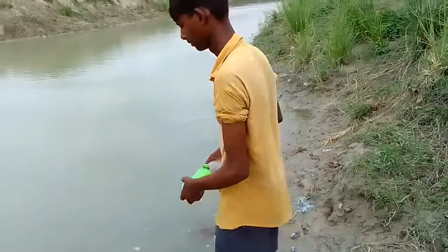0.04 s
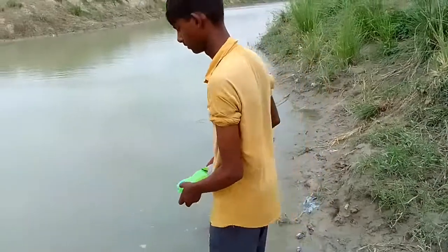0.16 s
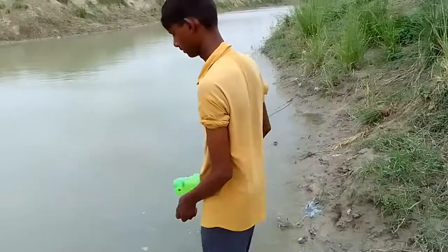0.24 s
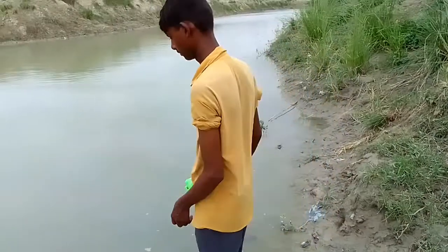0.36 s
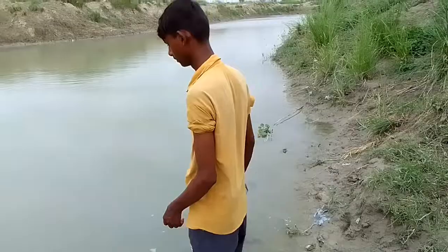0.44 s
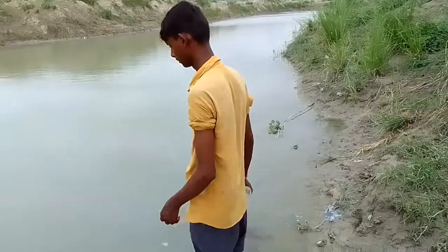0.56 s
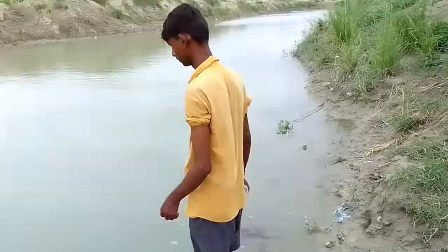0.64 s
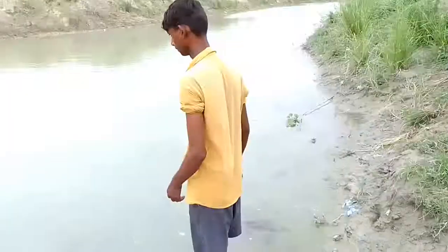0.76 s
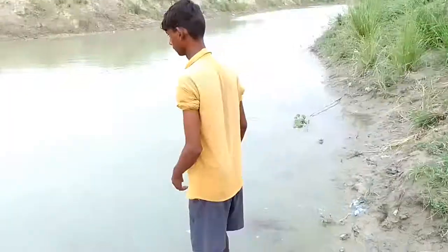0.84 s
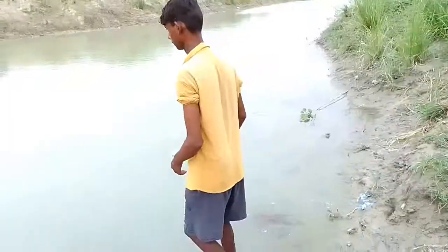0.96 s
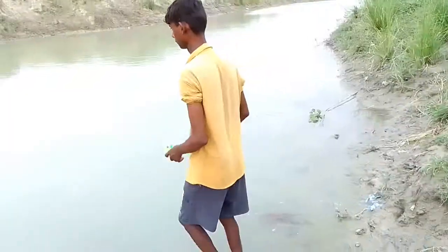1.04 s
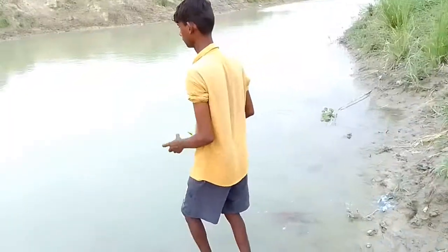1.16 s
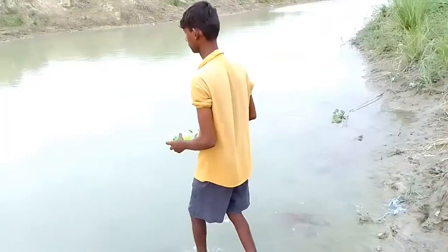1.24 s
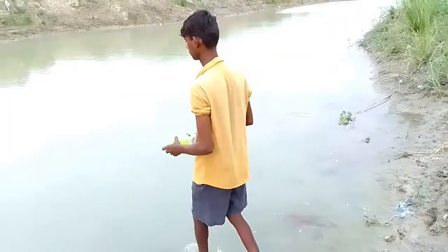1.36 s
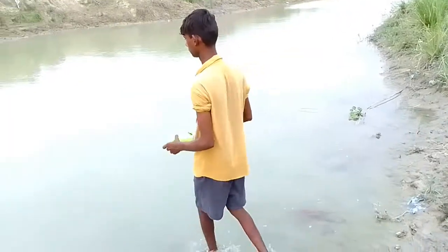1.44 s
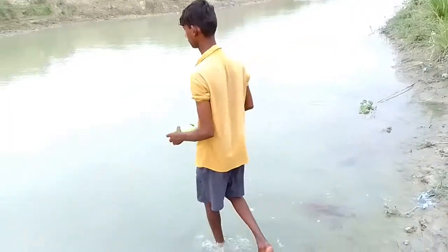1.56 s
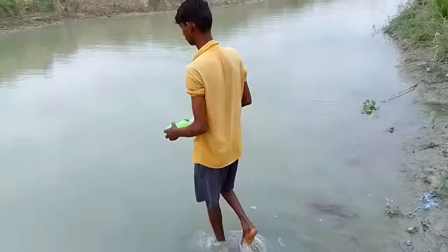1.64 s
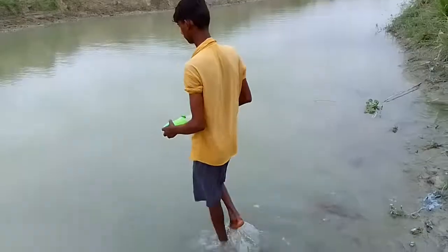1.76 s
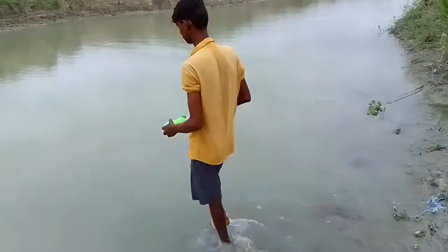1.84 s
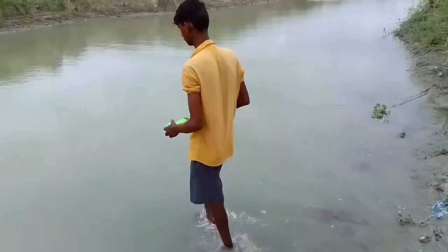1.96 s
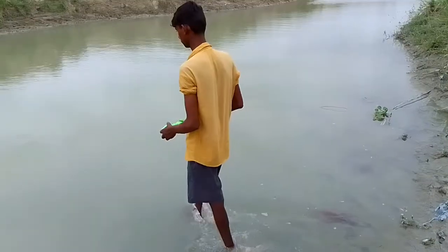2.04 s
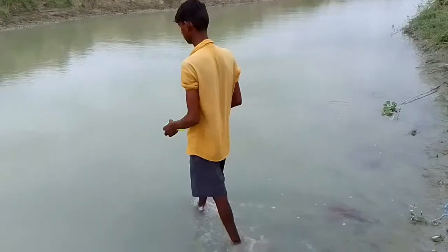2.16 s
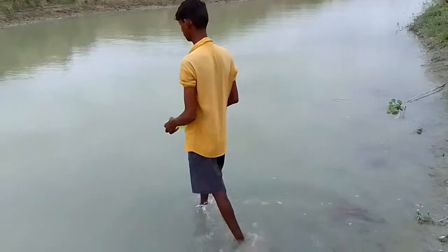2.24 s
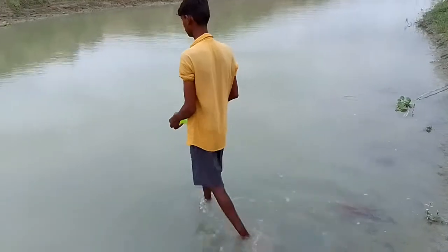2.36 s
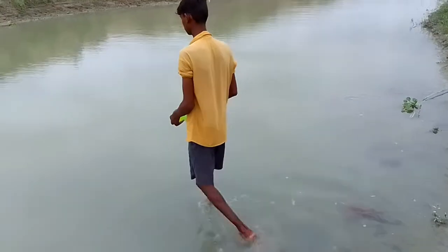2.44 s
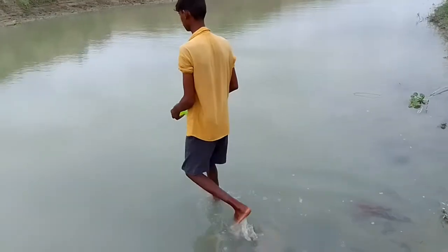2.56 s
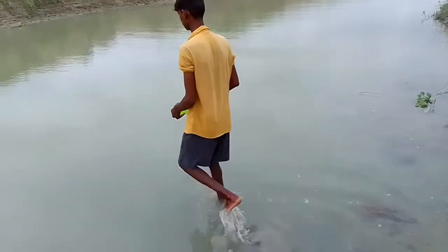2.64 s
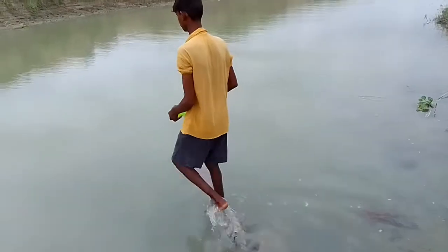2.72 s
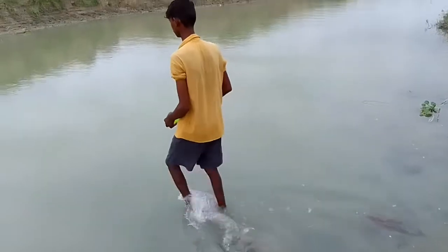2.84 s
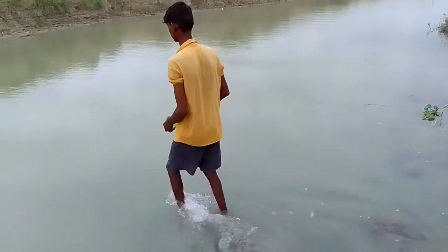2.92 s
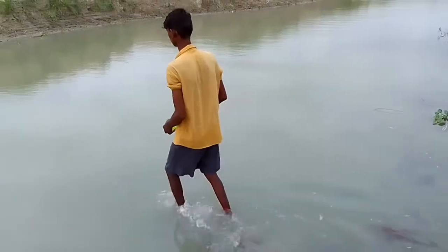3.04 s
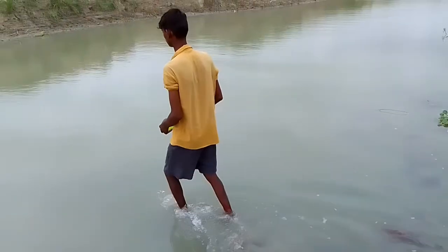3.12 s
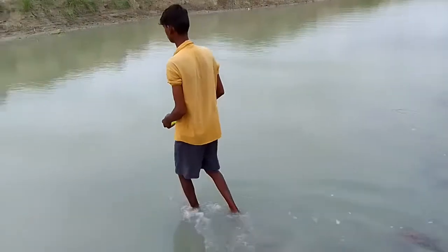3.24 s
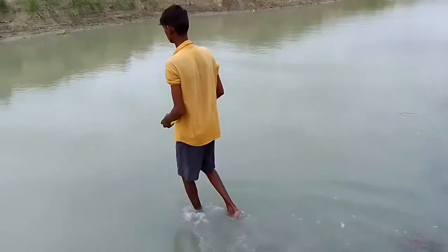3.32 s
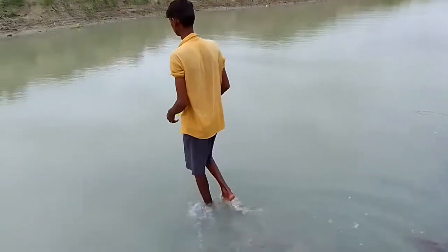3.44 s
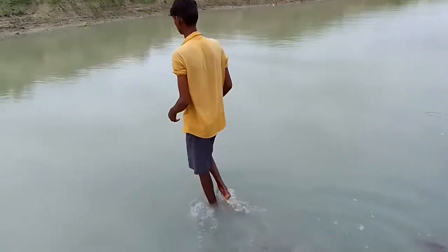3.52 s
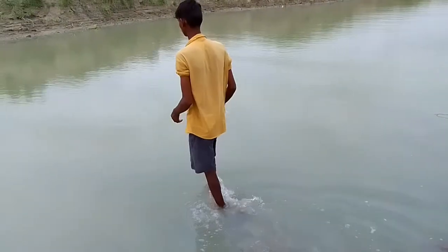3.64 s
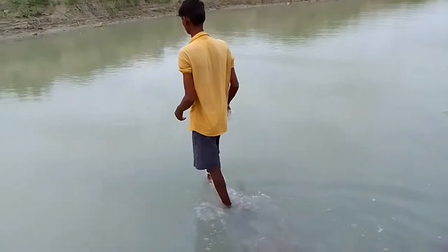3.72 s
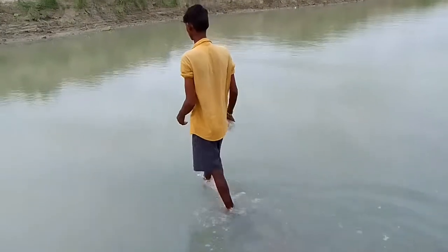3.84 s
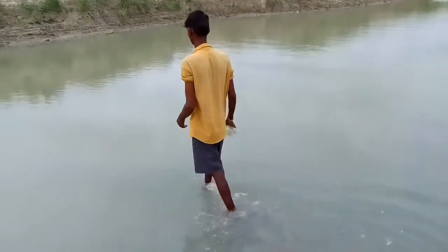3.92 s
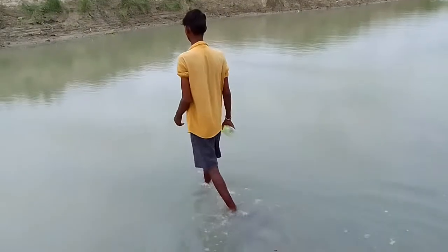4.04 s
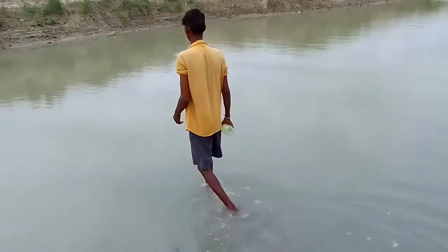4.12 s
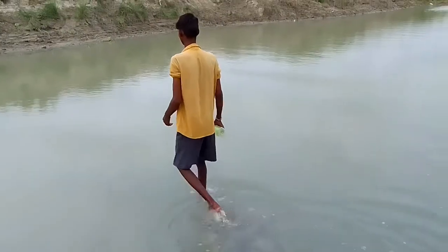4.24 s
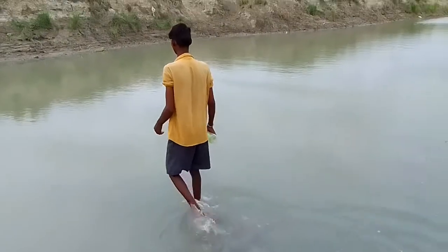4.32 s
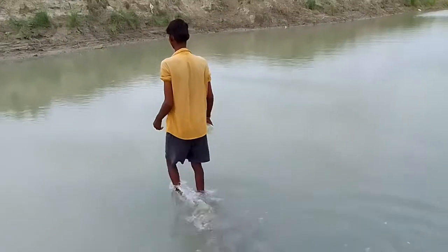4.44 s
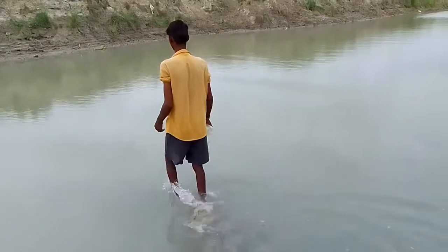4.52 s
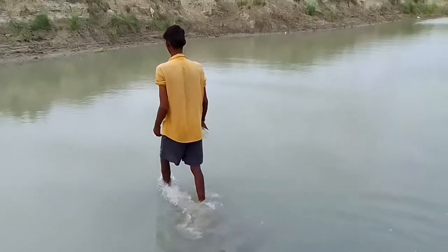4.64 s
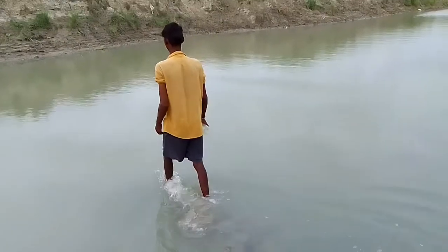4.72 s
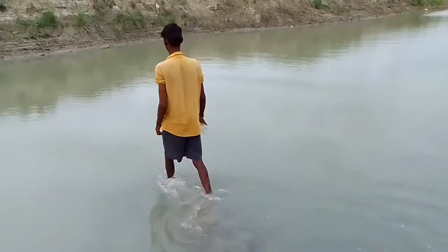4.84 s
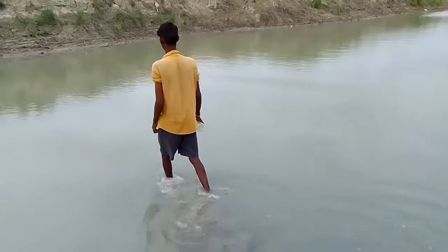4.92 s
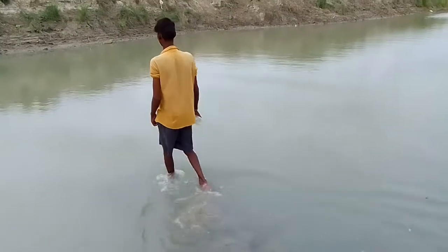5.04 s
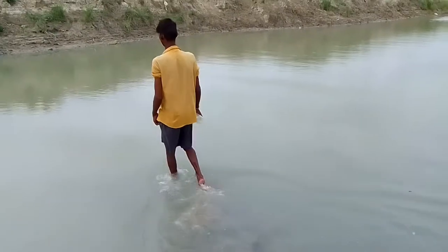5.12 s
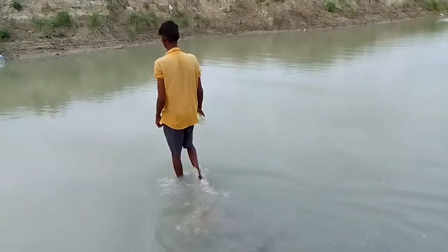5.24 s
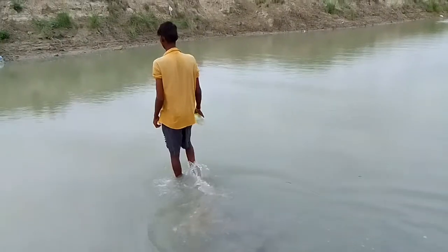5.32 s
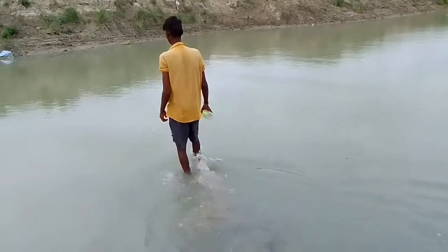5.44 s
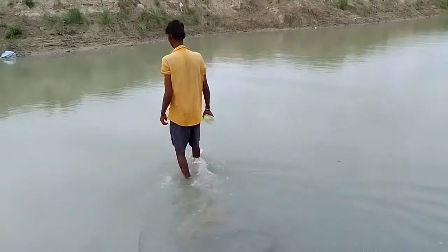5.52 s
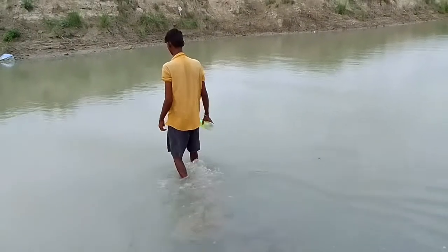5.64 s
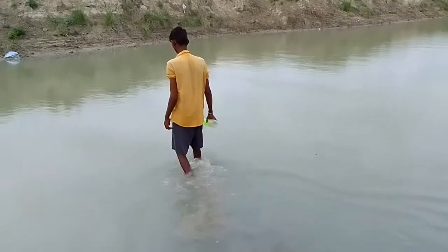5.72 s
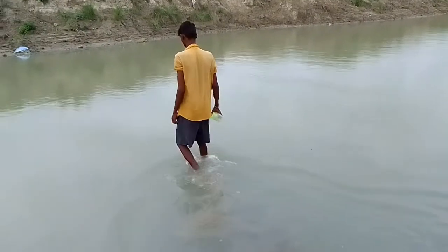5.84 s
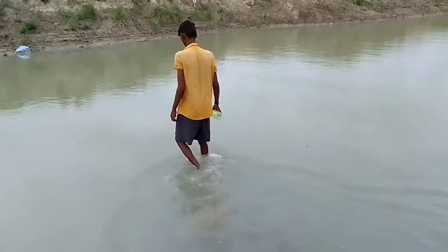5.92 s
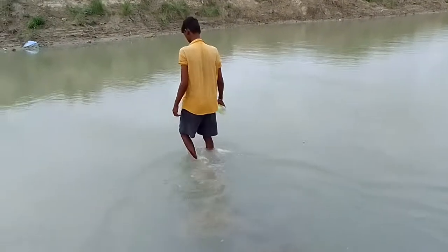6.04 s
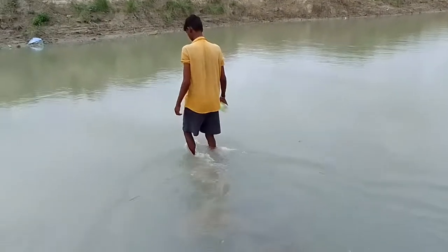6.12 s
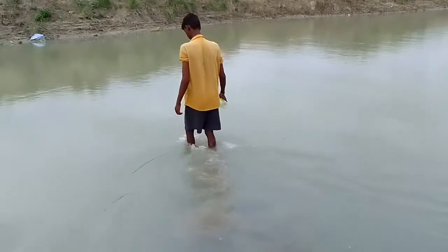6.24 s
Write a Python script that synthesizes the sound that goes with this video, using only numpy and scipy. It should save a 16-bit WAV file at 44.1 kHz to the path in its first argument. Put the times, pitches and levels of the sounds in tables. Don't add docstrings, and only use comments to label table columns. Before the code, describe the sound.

Someone wades away through shallow river water, each stride slapping, gurgling and splashing, with light wind bumps and faint bird trills.

```python
import sys
import numpy as np
from scipy import signal
from scipy.io import wavfile
from scipy.ndimage import uniform_filter1d

SR = 44100
rng = np.random.default_rng(int(sys.argv[2]) if len(sys.argv) > 2 else 0)


def persist_wave(psi):
    counts = np.round(np.clip(psi, -1, 1) * 32767).astype(np.int16)
    wavfile.write(sys.argv[1], SR, np.atleast_2d(counts).T)


def field_ratio(decibels):
    return 10 ** (np.asarray(decibels, dtype=float) / 20)


N = 277080

# start_s, drag_s, force_db, depth_db, splash_db
STRIDES = [
    (0.527, 0.44, -77, 4.5, 7.5),
    (1.152, 0.47, -58, -1.5, 6),
    (1.702, 0.58, -50, 0, 2),
    (2.649, 0.59, -50.5, -1, 0),
    (3.482, 0.61, -51, 1, 0),
    (4.352, 0.63, -49.5, 1.5, 0),
    (5.237, 0.58, -51.5, -0.5, 0),
    (6.132, .3, -58.5, 0.5, 0.5),
]
# crest_s, force_db, fall_s, depth_db, splash_db
SURGES = [(0.712, -55, 0.026, 2, 0.5), (0.765, -58.5, 0.038, 2.5, 3.5), (1.288, -56, 0.018, 4.5, 7),
          (1.436, -47, 0.14, 2, 2), (1.754, -48, 0.082, 4, -1), (2.201, -52.5, 0.18, -8, 9),
          (2.929, -50.5, 0.31, -9, 9), (3.117, -46, 0.11, 0.5, 3.5), (3.85, -48, 0.038, 2.5, -5),
          (4.62, -47.5, 0.32, -2, 0.5), (5.42, -48, 0.3, 3.5, -5.5), (5.621, -46.5, 0.063, 0, -2),
          (5.74, -55.5, 0.14, 16, -10.5), (6.261, -47.5, 0.064, 3.5, -7.5)]
# level_db at the usual force, then slopes in dB per dB of force, depth, splash
HOLLOW = (-80, 1.77, -0.5, 0.)
GURGLE = (-60.5, 1.5, 3, 1)
SLOSH = (-52, 1.3, 0.5, 0.)
TRICKLE = (-59.5, 1.13, 1.43, 1.19)
FIZZ = (-69, 0.96, 0.66, 1.2763)
SPRAYED = (-80.5, 1.13, 1.5, 2.16)
# crest_s, level_db, pitch_hz, width_ms
PLUNKS = [(1.3047, -22.5, 1403, 3.9), (1.453, -31, 1388, 6.3), (1.3293, -34.5, 1360, 5.4),
          (1.3667, -31.5, 1366, 5.4), (1.4317, -34, 1435, 5.3), (1.446, -21.5, 1376, 3.33),
          (1.479, -39, 1310.0, 7.1), (1.722, -28.5, 1372, 5.97), (1.694, -44, 1370, 7.2),
          (1.755, -34, 1300, 4.1), (1.791, -37.5, 1290, 5.5), (2.0059, -25.5, 1360, 2.7),
          (2.06, -32.5, 1260, 4.6), (2.069, -37, 1367, 5.5), (2.1999, -25.5, 1135, 2.18),
          (2.2288, -34, 1384, 4.8), (2.6559, -29, 1360, 3.9), (2.7008, -32, 1430, 7),
          (3.0818, -35, 1310, 5.2), (3.11, -31, 1314, 4.8), (3.133, -36, 1230, 2.7),
          (3.1447, -37, 1420, 4.0), (3.4943, -33.5, 1340.0, 5.3), (3.5459, -29.5, 1260, 3.2),
          (3.566, -36.5, 1390, 4.5), (3.6688, -34.5, 1080, 5.4), (3.839, -28.5, 1353, 3.3),
          (3.857, -34, 1380, 3.3), (4.4747, -35.5, 1360, 4.5), (4.5146, -33.5, 1220, 2.65),
          (4.577, -34.5, 1350, 3.2), (4.601, -38.5, 1336, 11.2), (4.701, -30, 1300, 3.4),
          (4.7918, -34.5, 1440, 5.0), (4.7985, -29.5, 1330, 2.8), (4.882, -33, 1350, 4.2),
          (5.406, -30.5, 1290, 3.5), (5.4643, -33.5, 1250, 5.0), (5.4856, -36, 1239, 8.7),
          (5.5025, -35.5, 1260, 4.5), (5.6068, -36.5, 1260, 3.8), (5.6199, -40, 1265, 4.1),
          (5.6682, -36, 1320, 3.5), (6.1754, -32, 1206, 4.5), (6.2609, -31, 1155, 5.3),
          (0.537, -47.5, 1270, 1.46), (1.1437, -50, 1550, 4.4), (1.1976, -43, 1470, 3.4),
         (1.25, -42.5, 1360, 4.7), (1.2901, -36, 1480, 3.6), (1.3364, -38, 1290, 5.4),
         (1.496, -48, 1540, 5), (1.613, -39.5, 1284, 8.2), (1.7339, -39, 1380, 4.5),
         (2.0798, -35.5, 1370, 3.1), (2.289, -34.5, 1430, 5.1), (2.349, -40, 1260, 3.03),
         (2.4406, -49.5, 1360, 8.8), (2.6842, -49, 1360, 3.8), (2.7184, -43, 1376, 13),
         (2.815, -39, 1370, 4.7), (2.8794, -38.5, 1160, 2.9), (2.8976, -38, 1333, 3.9),
         (3.099, -48, 1340.0, 5.6), (3.259, -38.5, 1470, 3.5), (3.3001, -38.5, 1340, 4.7),
         (3.3147, -45, 1340, 5.3), (3.485, -46, 1350, 2.85), (3.5165, -36, 1360, 5.4),
         (3.552, -45, 1310, 2.5), (3.59, -37, 1326, 3.05), (3.8726, -39, 1320, 3),
         (3.9224, -35.5, 1350, 3.5), (3.971, -39, 1300, 2.7), (4.104, -44, 1330, 4.8),
         (4.357, -39, 1290, 3.3), (4.3866, -42, 1340, 3.83), (4.4066, -38.5, 1290, 2.9),
         (4.4138, -34, 1397, 3.9), (4.424, -42, 1340.0, 5.5), (4.586, -42, 1393, 6.5),
         (4.638, -38.5, 1316, 4.5), (5.0468, -40.5, 1324, 4.5), (5.2433, -40.5, 1390, 5.4),
         (5.268, -39.5, 1330, 5.2), (5.2772, -37, 1270, 3.1), (5.2848, -36.5, 1184, 3.7),
         (5.326, -42, 1370, 4.7), (5.659, -40, 1324, 10.5), (5.75, -38, 1214, 5.5),
         (6.132, -46.5, 1070, 4.3)]
# start_s, level_db, pitch_hz, t60_s
GULPS = [(0.537, -40.5, 841, 0.025), (0.65, -42.5, 687, 0.023), (0.675, -45.5, 856, 0.036),
         (0.756, -51, 630, 0.035), (1.248, -43.5, 760, 0.0086), (1.318, -45, 659, 0.17),
         (1.395, -32, 950, 0.025), (1.436, -24.5, 770, 0.011), (1.713, -36.5, 920, 0.031),
         (1.746, -34.5, 780, 0.029), (1.865, -45, 557, 0.033), (2.198, -37.5, 896, 0.06),
         (3.04, -36.5, 886, 0.04), (3.166, -40, 880, 0.018), (3.836, -40, 650, 0.018),
         (4.01, -45, 606, 0.073), (4.402, -43.5, 990, 0.032), (4.51, -41, 930, 0.038),
         (5.423, -44, 625, 0.061)]
# crest_s, level_db, pitch_hz, width_ms
BLIPS = [(0.59, -57.5, 616, 11.5), (0.6055, -47, 710, 9), (0.617, -51, 840, 5.25), (0.643, -51, 792, 6),
         (1.3461, -35.5, 750, 2.6), (1.462, -38, 1033, 8.3), (1.4782, -41, 900, 9.5),
         (1.7671, -45, 666, 9.1), (1.7834, -45.5, 635, 9.1), (2.0719, -43.5, 870, 11.4),
         (2.6556, -43.5, 940, 6.9), (2.7077, -45, 800, 7.1), (2.8151, -47, 893, 8.6),
         (3.0794, -44, 635, 9.8), (3.11, -45.5, 582, 10.7), (3.4959, -46, 756, 3.8),
         (3.5461, -42.5, 945, 6.9), (3.5921, -47.5, 617, 6.7), (3.9742, -45.5, 617, 7.3),
         (4.0405, -50.5, 676, 15), (4.5495, -43, 581, 15.3), (4.6215, -39, 922, 5.8),
         (5.0234, -50.5, 877, 11.7), (5.3899, -53, 810, 5.9), (5.4001, -42, 955, 9.9),
         (5.697, -41, 680, 5.2), (5.9274, -52.5, 630, 5.7), (6.1308, -58, 950, 6.4),
         (6.1738, -48.5, 960, 6.3), (6.2673, -52, 604, 8.6)]
# crest_s, level_db, pitch_hz, width_ms
DRIPS = [(0.538, -58, 2430, 2.5), (0.565, -62, 1600, 4), (0.576, -56, 1590, 4), (0.617, -53, 2160, 2.6),
         (0.617, -53, 1480, 4), (0.644, -49, 1460, 4), (0.6532, -55, 2310, 4.5), (0.7086, -55, 2140, 1.3),
         (0.7587, -60, 2200, 6.3), (1.284, -37, 1540, 2.9), (1.4462, -35.5, 2330, 2.3),
         (1.6588, -51.5, 2630, 4), (2.308, -34.5, 1900, 3.2), (2.4585, -48, 2420, 5.4),
         (2.656, -49.5, 2480, 5.7), (3.193, -43, 1864, 8.2), (3.4954, -39.5, 2495, 3),
         (3.5245, -45, 1846, 7.6), (3.5963, -45, 1940, 4.5), (3.922, -46.0, 2200, 2.1),
         (3.9715, -45.5, 1970, 3.3), (4.3754, -46, 1880, 4.6), (4.3868, -48.0, 1820, 4.7),
         (4.4108, -42, 1920, 3.9), (4.7003, -36.5, 1940, 2.0), (4.7896, -40, 1820, 3.7),
         (5.2439, -48.5, 1930, 7.8), (5.2766, -37, 1740, 4.4), (5.327, -42.5, 1890, 4.5),
         (5.6265, -39, 1850, 3.9), (6.1575, -47, 2320, 4.5)]
# start_s, level_db, pitch_hz
GLUGS = [(0.613, -48.5, 330), (1.234, -52, 327), (1.445, -36, 232), (1.585, -51.5, 190), (2.831, -48, 292),
         (2.951, -39.5, 238), (3.074, -37, 272), (3.099, -36.5, 306), (3.122, -37, 322), (3.156, -45, 280),
         (3.213, -48, 275), (3.609, -43, 355), (3.678, -38.5, 492), (3.76, -50, 225), (4.421, -48.5, 430),
         (5.561, -46, 240), (6.263, -54.5, 404)]
# start_s, level_db, pitch_hz, top_db (relative to the peak)
SNAPS = [(0.512, -58, 3600, -20), (0.535, -55, 3130, -10), (0.597, -60, 4870, -19), (0.614, -56, 3680, -13),
         (0.055, -59.5, 5340, -5), (0.708, -49, 4700, -31.5), (0.754, -46, 7160, -12),
         (1.2145, -46, 6810, -10), (1.249, -42, 4430, -28), (1.282, -36, 7230, -26),
         (1.3195, -44, 4300, -11), (1.415, -40, 4200, -18), (1.44, -38, 3070, -10),
         (1.5744, -42.5, 3870, -14), (1.717, -41.5, 3010, -13), (1.789, -46, 3860, -20),
         (2.1937, -45.5, 5400, 1.5), (2.272, -45.5, 4680, -3.5), (2.331, -44.5, 3920, -15),
         (2.4514, -44.5, 3940, -14), (2.661, -45, 4360, -43), (2.764, -41.5, 3740, -26),
         (2.84, -42.5, 4940, -20), (2.91, -40.5, 3500, -26), (2.949, -43, 3400, -10),
         (3.145, -53, 4970, -9), (3.163, -52, 4840, -4), (3.214, -43.5, 3930, -28),
         (3.326, -51.5, 5530, -24), (3.494, -40.5, 3400, -17), (3.909, -45.5, 5400, -31),
         (3.972, -44, 3860, -24), (4.354, -49, 6860, -5.5), (4.394, -46, 3870, -13), (4.541, -51, 4130, -5),
         (4.5763, -34, 4050, -26), (4.628, -36.5, 7360, -16), (4.7355, -42.5, 6050, -22),
         (4.792, -48.5, 7270, -3), (4.9757, -41, 4840, -13)]
# start_s, middle_db, top_db
CRACK = (4.6996, -41, -32)
# delay_ms, gain (linear)
ECHOES = [(4.047, -0.39), (6.3, 0.18)]
# frequency_hz, density_db (per Hz)
COLOUR = [(120, -61), (200, -22), (341, -1.5), (434, -9.5), (638, -7), (1070, -10.5), (1380, -3),
          (1630, -3.5), (2590, -15.5), (3540, -29.5), (3880, -24), (7010, -25.5), (8900, -46),
          (14400, -34.5), (16400, -42.5)]
# frequency_hz, width_hz, gain_db
HOUSING = [(930, 80, 3), (1870, 150, 4), (2090, 120, -7), (2500, 300, 4), (2885, 100, -15), (3030, 150, 4),
           (3940, 120, 4), (4110, 80, -10), (4370, 90, -8), (4860, 100, -15), (5254, 170, -17),
           (5800, 100, -6), (6150, 170, -8), (6546, 110, -12), (6980, 400, 5), (7300, 110, -8),
           (7800, 110, -7), (8785, 200, -6), (9517, 150, -8), (11800, 200, -7), (13090, 230, -15),
           (445, 60, -6), (4272, 80, 3), (4522, 120, 3)]
# first_hz, later_hz, width_hz, first_db, later_db
SLIDING = [(1754, 1600, 121, -3.5, -12.5), (2790, 2440, 78, 10.5, 0.5), (3700, 3620, 58, -7, -6),
           (3180, 3320, 70, 2, -2), (7880, 7200, 320, 5, -1.5)]
# low_hz, high_hz, share (of the time), weight (exponent of loud)
DROPPED = [(8300, 8850, .13, 2), (8850, 9600, .07, 2), (9650, 10250, .3, 1)]
# time_s, level_db
WIND = [(0.0, -68), (0.03, -70.5), (0.82, -66), (0.93, -59.5), (2.24, -62.5), (2.27, -58), (2.43, -60.5),
        (2.89, -59.5), (2.92, -51), (3.2, -63), (3.92, -58), (4.16, -62.5), (5.39, -54.5), (5.4, -62.5),
        (6.26, -53), (6.28, -45.5)]
# start_s, level_db, pitch_hz
THUDS = [(0.943, -54, 58), (1.442, -45, 129), (2.261, -45.5, 57), (2.915, -42.5, 39), (3.866, -48.5, 64),
         (5.093, -43, 43.6), (5.859, -37.5, 84), (5.967, -44.5, 86.5), (6.079, -35, 38.8),
         (6.088, -42, 101), (6.112, -36, 103.4), (6.222, -36.5, 47.7)]
# start_s, length_s, start_hz, end_hz, level_db
TRILLS = [
    (2.985, 0.065, 4020, 4470, -54.5),
    (3.223, 0.082, 4000, 4670, -60),
    (3.502, 0.0452, 4170, 4730, -54.5),
    (3.74, 0.0543, 4250, 4560, -52),
]
# time_s, pitch_hz, level_db
DOVE = [
    (0.06, 346, -79),
    (0.24, 356, -80),
    (0.6, 344, -87.5),
]
# frequency_hz, density_db (per Hz)
FLOOR = [(88, -47.5), (170, -23.5), (250, -14.5), (354, -12.5), (414, -6), (524, -15.5), (905, -17),
         (1340, -11), (2600, -23), (4240, -25), (4950, -32), (7770, -24), (9260, -37.5), (16000, -35.5)]

FORCE_DB, BREEZE_DB, FLOOR_DB = -50, -60, -79
ATTACK_S = 0.0012
SAG_DB_PER_S, RELEASE_DB_PER_S, KNEE_S = 1.5, 90, 0.029
LINGER_DB, LINGER_DB_PER_S, LINGER_DEPTH_DB, LINGER_SPLASH_DB = -80.5, -1, -9, 16.5
RISE_SHARE = 0.41
CREST, SWELL_SHARE, CLIMB = 0.91, 0.3439, 0.058
FLUTTER_DB, FLUTTER_SLOPE = -74.5, 1.44
TURN_S = 2.53
EDGE_HZ = 15450
OFFSET = 0.0052


def churn():
    surge, moving = wander(size=500), water()
    hollow = swarm(181, 405, surge, per_s=120, cycles=14, spread_db=2.5, clump_db=2.5, hiss=1.1)
    gurgle = swarm(493, 1010, surge, per_s=260, cycles=26, spread_db=1.5, clump_db=0.9, hiss=0.6)
    slosh = swarm(1004, 1568, surge, per_s=600, cycles=30, spread_db=2.3, clump_db=0.8, hiss=0.7)
    trickle = swarm(1640, 2900, surge, per_s=500, cycles=40, spread_db=2.2, clump_db=1.1, hiss=1.0)
    fizz = swarm(2750, 8960, surge, per_s=1500, cycles=45, spread_db=3.2, clump_db=2.2, hiss=1.0)
    spray = swarm(7560, 17500, surge, per_s=1100, cycles=110, spread_db=3.5, clump_db=0.9, hiss=1.2)
    sizes = ((HOLLOW, hollow), (GURGLE, gurgle), (SLOSH, slosh), (TRICKLE, trickle))
    bubbles = sum(follow(moving, law) * x for law, x in sizes)
    fine = follow(moving, FIZZ) * fizz + follow(moving, SPRAYED) * spray
    return bubbles + mirrored(fine)


def water():
    t = np.arange(N * 1000 // SR + 2) / 1000
    parts = []
    for s, length, db, depth_db, splash_db in STRIDES:
        u = t - s
        entered = np.clip(u / ATTACK_S, 0, 1)
        settle = RELEASE_DB_PER_S * KNEE_S * np.logaddexp(0, (u - length) / KNEE_S)
        force = field_ratio(db - SAG_DB_PER_S * u - settle) * entered
        ripples = field_ratio(LINGER_DB - LINGER_DB_PER_S * u) * entered
        parts.append((force ** 2, depth_db - 0.12 * settle, splash_db))
        parts.append((ripples ** 2, LINGER_DEPTH_DB, LINGER_SPLASH_DB))
    starts = np.array(STRIDES)[:, 0]
    for s, db, fall, depth_db, splash_db in SURGES:
        u = t - s
        shape = np.exp(np.where(u < 0, -(u / (RISE_SHARE * fall)) ** 2, -u / fall))
        in_stride = t > starts[starts < s][-1]
        force = field_ratio(db) * shape * in_stride
        parts.append((force ** 2, depth_db, splash_db))
    total = sum(p[0] for p in parts) + 1e-12
    depth, splash = (sum(p[0] * p[k] for p in parts) / total for k in (1, 2))
    return t, 10 * np.log10(total), depth, splash


def follow(moving, law):
    t, force, depth, splash = moving
    db, by_force, by_depth, by_splash = law
    level_db = db + by_force * (force - FORCE_DB) + by_depth * depth + by_splash * splash
    return np.interp(np.arange(N) / SR, t, field_ratio(level_db))


def swarm(lo_hz, hi_hz, surge, per_s, cycles, spread_db, clump_db, hiss):
    clumps = evened(wander(size=400) + 0.5 * surge)
    bursts = rng.random(N) < per_s / SR
    size = field_ratio(spread_db * np.minimum(rng.exponential(1, N), 4)) * bursts
    kind, out = rng.integers(0, 12, N), np.zeros(N)
    for k, hz in enumerate(np.geomspace(lo_hz, hi_hz, num=12)):
        grain = bubble(hz, cycles / hz, 0.4, 1.35 / hz)
        grain = grain / np.linalg.norm(grain)
        at = np.flatnonzero(size * (kind == k))
        places = (at[:, None] + np.arange(len(grain))).ravel()
        out += np.bincount(places, np.outer(size[at], grain).ravel(), N)[:N]
    out = (evened(out) + hiss * rng.standard_normal(N)) * field_ratio(clump_db * clumps)
    return evened(signal.oaconvolve(out, housing(lo_hz, hi_hz))[:N])


def bubble(hz, t60, rise, start):
    t = np.arange(round(1.5 * t60 * SR) + 8) / SR
    turns = np.cumsum(hz * 2 ** (rise * t / t60)) / SR
    return np.sin(2 * np.pi * turns) * field_ratio(-60 * t / t60) * (1 - np.exp(-t / start))


def splashes():
    out, deep, crack = np.zeros((3, N))
    high, top, sharp = housing(2900, 8600), housing(8600, 14900), housing(8000, 18000)
    puff = field_ratio(-60 * np.arange(600) / SR / 0.044)
    soft = puff ** 2 * (1 - puff ** 3) ** 2
    swell_s = 0.002
    for s, db, hz, t60 in GULPS:
        note = bubble(0.964 * hz, np.clip(t60, 0.01, 0.15), 0.14, 1.16 * swell_s)
        add(out, s, field_ratio(db) * note / abs(note).max())
    for s, db, hz, ms in PLUNKS + BLIPS + DRIPS:
        lead, note = blip(hz, np.clip(ms, 1, 30) / 1000)
        add(out, s - lead, CREST * field_ratio(db) * note)
    for s, db, hz in GLUGS:
        lead, note = blip(hz, 0.01095)
        add(deep, s + 0.00628 - lead, field_ratio(db - 9) * note)
    for s, db, hz, top_db in SNAPS:
        lead, note = blip(hz, 0.003)
        add(out, s + 0.0023 - lead, field_ratio(db - 11) * note)
        for taps, gain_db in ((high, db - 8), (top, db + top_db - 5.5)):
            add(out, s - swell_s, field_ratio(gain_db) * tick(soft, taps))
    for taps, db in ((high, CRACK[1]), (sharp, CRACK[2])):
        add(crack, CRACK[0], field_ratio(db) * tick(puff ** 7, taps))
    return banks(out) + deep, crack


def tick(shape, taps):
    sound = np.convolve(shape * rng.standard_normal(600), taps)[:900]
    return sound / abs(sound).max()


def blip(hz, width):
    lead = 2 * SWELL_SHARE * width
    t = np.arange(round((lead + 5 * width) * SR)) / SR - lead
    swell = (t / (SWELL_SHARE * width)) ** 2
    ring = (np.abs(t) / ((1 - SWELL_SHARE) * width)) ** 1.1
    turns = np.cumsum(hz * 2 ** (CLIMB * t / width)) / SR
    return lead, field_ratio(-6 * np.where(t < 0, swell, ring)) * np.sin(2 * np.pi * (turns + rng.random()))


def mirrored(x):
    out, at = x.copy(), np.arange(N)
    for ms, gain in ECHOES:
        delay = ms / 1000 * SR * (1 + 0.022 * wander(size=20000))
        out += gain * np.interp(at - delay, at, x)
    return out * np.std(x) / np.std(out)


def banks(x):
    t = np.arange(round(0.15 * SR)) / SR
    sparse = rng.choice([-1., 1.], len(t)) * (rng.random(len(t)) < 0.05)
    tail = sparse * field_ratio(-60 * t / 0.24) * (t > 0.004)
    return x + field_ratio(-7.5) * signal.oaconvolve(x, tail / np.linalg.norm(tail))[:N]


def wind():
    out = np.zeros(N)
    wind_db = along(WIND, 1)
    flutter_db = FLUTTER_DB + FLUTTER_SLOPE * (wind_db - BREEZE_DB)
    for level_db, lo_hz, hi_hz in ((wind_db - 0.5, 18, 80.9), (flutter_db, 85, 157)):
        lumps = evened(uniform_filter1d(rng.standard_normal(N), size=2000))
        band_pass = signal.butter(3, [lo_hz, hi_hz], "bandpass", fs=SR, output="sos")
        band = signal.sosfilt(band_pass, rng.standard_normal(N))
        out += field_ratio(level_db) * evened(band * field_ratio(4.2 * lumps))
    for s, db, hz in THUDS:
        turns = np.arange(round(2.4 * SR / hz)) * hz / SR
        add(out, s, field_ratio(db) * np.sin(2 * np.pi * turns) * np.hanning(len(turns)))
    return out


def birds():
    out = np.zeros(N)
    for s, length, hz0, hz1, db in TRILLS:
        t = np.arange(round(length * SR)) / SR
        u = t / length
        jitter_hz = 800 * uniform_filter1d(rng.standard_normal(len(t)), size=40)
        hz = hz1 + (hz0 - hz1) * (1 - u) ** 2.1 + jitter_hz
        note = np.sin(2 * np.pi * np.cumsum(hz) / SR)
        pulses = np.cos(np.pi * 85 * (length - 0.008 - t)) ** 4
        add(out, s, field_ratio(db - 4 + 10.2 * u) * note * pulses * np.minimum((1 - u) * 12, 1))
    out = signal.oaconvolve(out, causal(ripple(np.fft.rfftfreq(4096, 1 / SR))))[:N]
    first, last = DOVE[0][0], DOVE[-1][0]
    cooing = np.interp(np.arange(N) / SR, [first, first + 0.02, last - 0.05, last], [0, 1, 1, 0])
    coo = np.sin(2 * np.pi * np.cumsum(along(DOVE, 1)) / SR)
    return out + np.sqrt(2) * field_ratio(along(DOVE, 2)) * cooing * coo


def air():
    hz = np.fft.rfftfreq(4096, 1 / SR)
    taps = causal(read(FLOOR, hz) + 0.7 * ripple(hz))
    fading_db = 6.2 * np.exp(-np.arange(N) / SR / 0.18)
    return field_ratio(FLOOR_DB + fading_db) * evened(signal.oaconvolve(rng.standard_normal(N), taps)[:N])


def housing(lo_hz, hi_hz):
    hz = np.fft.rfftfreq(4096, 1 / SR) + 1
    edges = -10 * np.log10((1 + (lo_hz / hz) ** 12) * (1 + (hz / hi_hz) ** 12))
    return causal(np.maximum(read(COLOUR, hz) + ripple(hz) + edges, -100))


def ripple(hz):
    return sum(db * np.exp(-0.5 * ((hz - f) / (width / 2)) ** 2) for f, width, db in HOUSING)


def turning(x):
    hz, t, z = signal.stft(x, SR, nperseg=1024)
    turned = 1 - np.exp(-(t / TURN_S) ** 2)
    db = 0
    for hz0, hz1, width, db0, db1 in SLIDING:
        off_hz = hz[:, None] - hz0 - (hz1 - hz0) * turned
        db = db + (db0 + (db1 - db0) * turned) * np.exp(-0.5 * (off_hz / (width / 2)) ** 2)
    return signal.istft(z * field_ratio(db), SR, nperseg=1024)[1][:N]


def gated(x):
    hz, t, z = signal.stft(x, SR, nperseg=1024)
    power = field_ratio(uniform_filter1d(20 * np.log10(abs(z) + 1e-20), size=11, axis=1))
    loud = power[(hz > 3000) & (hz < 15000)].mean(0) * field_ratio(0.7 * t)
    for lo_hz, hi_hz, share, weight in DROPPED:
        band = (hz > lo_hz) & (hz < hi_hz)
        under = power[band].mean(0) / loud ** weight
        z[np.ix_(band, under < np.quantile(under, share))] *= field_ratio(-16)
    return signal.istft(z, SR, nperseg=1024)[1][:N]


def causal(db):
    log = np.log(field_ratio(np.concatenate([db, db[-2:0:-1]])))
    return np.fft.ifft(np.exp(log - 1j * signal.hilbert(log).imag)).real[:2048]


def wander(size):
    return evened(uniform_filter1d(uniform_filter1d(rng.standard_normal(N), size=size), size=size))


def evened(x):
    return x / np.sqrt(np.mean(x ** 2) + 1e-20)


def read(points, hz):
    f, value = np.transpose(points)
    return np.interp(np.log(hz + 1), np.log(f + 1), value)


def along(rows, column):
    rows = np.array(rows)
    return np.interp(np.arange(N) / SR, rows[:, 0], rows[:, column])


def add(mix, s, sound):
    part = mix[round(s * SR):][:len(sound)]
    part += sound[:len(part)]


def scene():
    started = np.clip((np.arange(N) / SR - STRIDES[0][0]) / 0.0042, 0, 1)
    edge = signal.firwin(401, EDGE_HZ, window=("kaiser", 9), fs=SR)
    drops, crack = splashes()
    steady = signal.oaconvolve(turning(churn() * started + drops + air()), edge, "same")
    return (steady + crack + wind() + birds())[None]


def band_limit(x):
    return signal.sosfilt(signal.butter(12, 16500, fs=SR, output="sos"), x)


def record(dry):
    limit = signal.firwin(401, 16400, window=("kaiser", 9), fs=SR)
    mix = signal.oaconvolve(gated(dry[0])[None], limit[None], "same") + OFFSET
    return band_limit(mix)


dry = scene()
out = record(dry)
persist_wave(out)
```